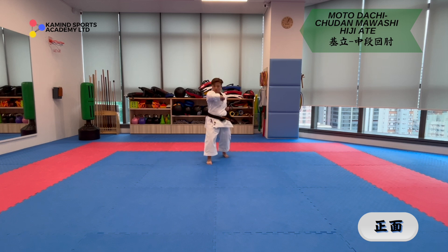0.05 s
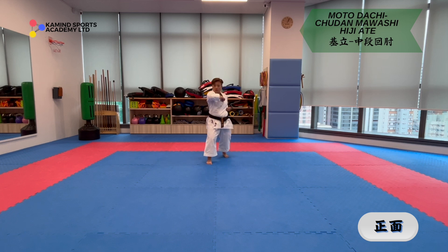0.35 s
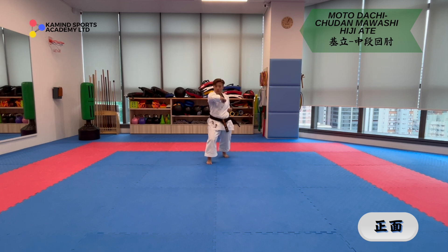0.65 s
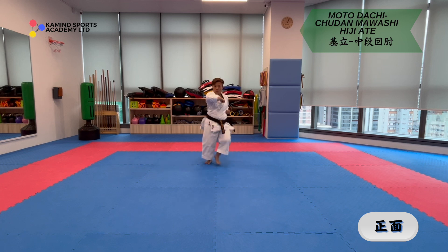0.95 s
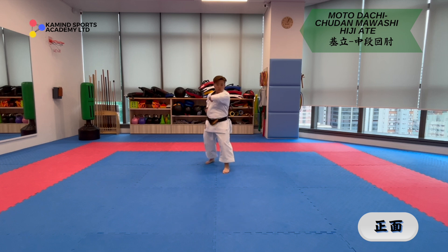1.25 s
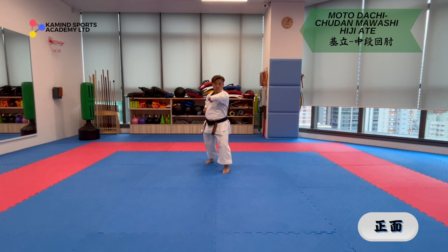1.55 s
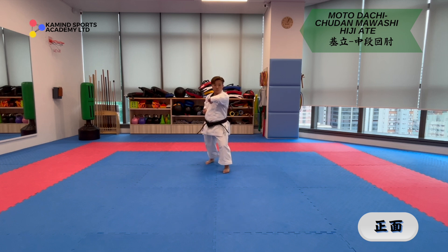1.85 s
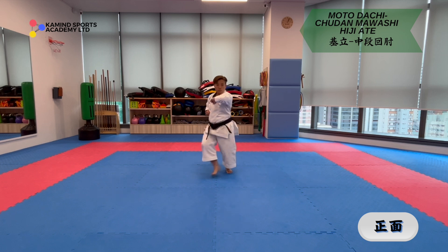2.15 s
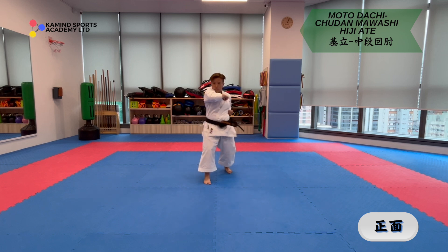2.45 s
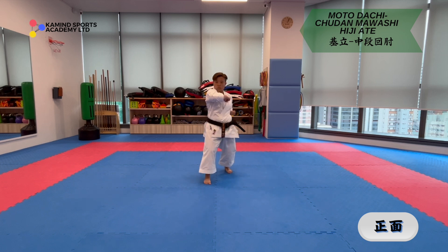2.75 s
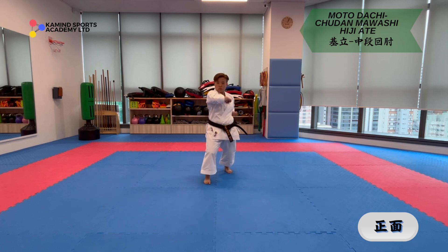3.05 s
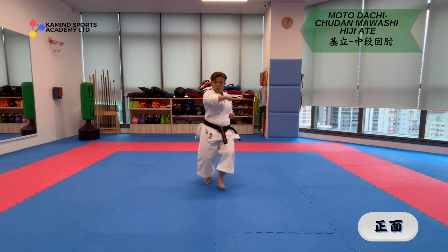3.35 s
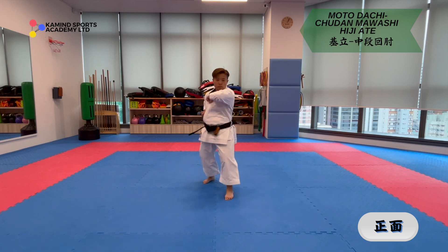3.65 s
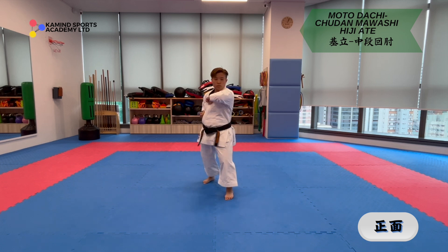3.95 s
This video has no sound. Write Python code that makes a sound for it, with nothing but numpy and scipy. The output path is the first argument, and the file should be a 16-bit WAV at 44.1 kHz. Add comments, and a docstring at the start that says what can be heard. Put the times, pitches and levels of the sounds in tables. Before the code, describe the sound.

A karate uniform rustles and whips as bare feet slide across a foam mat.

```python
"""A hall with a low ventilation rumble; a stereo pair stands a few metres from a foam mat.
A sleeve swipes and stiff cotton whips right at the start. Then someone in uniform takes three sliding
steps, each a light rustle, a sleeve swipe, trouser legs and bare soles brushing past, a soft landing
and the snapping cloth of a strike. The hall rings on after each."""
import sys
import numpy as np
from scipy import signal
from scipy.fft import rfft, irfft
from scipy.io import wavfile
from scipy.ndimage import uniform_filter1d

SR = 44100
rng = np.random.default_rng(int(sys.argv[2]) if len(sys.argv) > 2 else 0)


def transcribe(u):
    """Save the signal u as a 16-bit wav file named by the first command-line argument.

    u: samples, shape (n,) or (channels, n), limited to [-1, 1]; the rate is SR.
    q: integer samples, one column per channel.
    """
    v = np.clip(np.atleast_2d(u).T, -1, 1)
    q = np.round(v * 32767).astype(np.int16)
    wavfile.write(sys.argv[1], SR, q)


N = 176400

# Colour of whipped cotton. Each row: frequency in Hz, gain in dB.
WHIP_COLOUR = [(60, -3), (150, 5), (300, -2), (600, -1.5), (1400, -3), (2200, -7), (4500, -17.5),
               (8000, -20.5), (10500, -28), (15000, -35)]


def undb(db):
    """Decibels to gain."""
    return 10 ** (np.asarray(db) / 20)


def unit(x):
    """Scale to rms 1."""
    return x / np.sqrt(np.mean(x ** 2))


def along(points, hz):
    """Read (Hz, value) points on a log-frequency axis."""
    f, values = np.array(points, float).T
    return np.interp(np.log(np.maximum(hz, 1)), np.log(f), values)


def bins(n):
    """Frequencies of an n-sample spectrum."""
    return np.arange(n // 2 + 1) * SR / n


def colour(x, points):
    """Filter by (Hz, dB) points."""
    n = x.shape[-1]
    return irfft(rfft(x) * undb(along(points, bins(n))), n)


def response(db_at, size=4096):
    """Minimum-phase impulse response of unit energy for a dB curve."""
    cepstrum = irfft(np.log(undb(db_at(bins(size)))))
    cepstrum[1:size // 2] *= 2
    cepstrum[size // 2 + 1:] = 0
    impulse = irfft(np.exp(rfft(cepstrum)))
    return impulse / np.linalg.norm(impulse)


def add(out, start, x):
    """Mix x in from a start time in seconds."""
    i = int(start * SR)
    x = x[max(-i, 0):N - i]
    out[max(i, 0):max(i, 0) + len(x)] += x


def hit(x, db, window_s=.01):
    """Give a short sound its level, as if its energy filled the window."""
    return x / np.linalg.norm(x) * np.sqrt(window_s * SR) * undb(db)


def diffuse(n):
    """Stereo noise from all directions, alike on both sides in the bass."""
    # Each row: frequency in Hz, side minus mid in dB.
    width = [(50, -16), (130, -10.5), (280, -4.5), (550, 1.5), (15000, -2.5)]
    mid, side = rng.standard_normal((2, n))
    return mid + colour(side, width) * np.array([[1], [-1]])


def ventilation():
    """Steady low rumble with a faint rush of air."""
    # Each row of both: frequency in Hz, gain in dB.
    rumble = [(20, -19), (30, -38), (40, -4), (52, 3), (66, 2.5), (82, -18), (108, 2.5), (135, -7),
              (165, -6.5), (210, -9), (270, -20), (340, -28.5), (450, -40), (1500, -67)]
    air = [(150, 6.5), (300, -6), (600, -14.5), (1100, -9.5), (2000, -14.5), (4000, -32), (8000, -34.5),
           (15000, -39.5)]
    return undb(-52.5) * unit(colour(diffuse(N), rumble)) + undb(-58.5) * unit(colour(diffuse(N), air))


def flutter(rate_hz=46, depth_db=1.5):
    """A randomly wavering gain: the cloth slackens and tightens as it moves."""
    span = int(SR / rate_hz)
    waver = uniform_filter1d(rng.standard_normal(N), span, mode="wrap")
    return undb(depth_db * unit(uniform_filter1d(waver, span // 2, mode="wrap")))


def catches(rate_hz, spread_db):
    """Threads catching and letting go: dense clicks of uneven size."""
    chance, size, sign = rng.random(N), rng.standard_normal(N), rng.choice([-1, 1], N)
    return unit((chance < rate_hz / SR) * sign * undb(spread_db * np.clip(size, -2, 2)))


def rub(moves, spectrum, release_s, grain, catch_hz, spread_db, peak_db, peak_oct):
    """Friction hiss and thread catches swell, hold and die, coloured by the moving panel."""
    # Each row of moves: start, rise and hold in seconds, level in dB, peak in Hz, treble in dB.
    # Each row of spectrum: frequency in Hz, gain in dB. Grain is the catches' share of the power.
    out, t = np.zeros(N), np.arange(SR // 2) / SR
    threads = np.sqrt(grain) * catches(catch_hz, spread_db)
    hiss = np.sqrt(1 - grain) * rng.standard_normal(N)
    friction = flutter() * (threads + hiss)
    for start, rise, hold, db, hz, treble_db in moves:
        speed = np.minimum(t / rise, 1) * np.exp(-np.maximum(t - rise - hold, 0) / release_s)
        panel = response(lambda f: along(spectrum, f)
                         + peak_db * np.exp(-.5 * (np.log2((f + 1) / hz) / peak_oct) ** 2)
                         + treble_db * f ** 2 / (f ** 2 + 3500 ** 2))
        stroke = speed * np.roll(friction, rng.integers(N))[:len(t)]
        add(out, start, undb(db) * signal.fftconvolve(stroke, panel))
    return out


def sleeve_swipes():
    """A sleeve wipes across the chest."""
    # Rows as in rub.
    wipes = [(-.03, 0.012, 0.037, -36, 2080, 8), (.755, 0.036, 0.0046, -40.5, 1340, -10),
             (.795, 0.011, 0.019, -37.5, 1420, -2.5), (.84, .02, 0.032, -46, 980, -18),
             (1.968, 0.0065, .003, -39, 1200, 6), (1.98, 0.0014, 0.0068, -37.5, 3180, 7),
             (1.982, 0.0064, 0.026, -35, 1290, -7.5), (3.156, 0.0033, 0.012, -38, 1130, 3.5),
             (3.171, 0.0025, 0.016, -38.5, 2980, -4.5), (3.208, 0.0036, 0.0056, -37.5, 1300, -4)]
    sleeve = [(60, -34), (200, -4), (550, -5), (950, -0.5), (1550, -1.5), (2050, -5), (3100, -3.5),
              (3750, -9.5), (4400, -8), (5700, -16), (7000, -15.5), (10500, -27), (15000, -39)]
    return rub(wipes, sleeve, release_s=.017, grain=.26, catch_hz=2500, spread_db=7,
               peak_db=6, peak_oct=.2)


def strikes():
    """The uniform whips at the end of a strike."""
    # Rows as in rub.
    whips = [(-.02, 0.021, 0.034, -37.5, 660, -4.5), (1.142, .003, 0.019, -33.5, 570, 7),
             (1.16, 0.0078, 0.015, -32.5, 730, 7), (1.205, 0.019, 0.0057, -35.5, 845, 0.5),
             (2.325, 0.043, 0.037, -36, 960, 7), (2.385, .015, 0.022, -34, 740, -1),
             (2.44, 0.0095, 0.015, -44.5, 750, 0), (3.504, .004, 0.029, -36.5, 600, 11),
             (3.53, 0.0091, 0.022, -36, 770, 3), (3.58, 0.0087, 0.018, -45, 650, -5)]
    return rub(whips, WHIP_COLOUR, release_s=.022, grain=.36, catch_hz=900, spread_db=7.5,
               peak_db=6, peak_oct=.17)


def jacket_rustles():
    """The jacket shifts lightly, cloth on cloth."""
    # Rows as in rub.
    shifts = [(.42, 0.026, 0.21, -66.5, 497, 0.5), (.615, 0.038, 0.02, -54.5, 550, -24),
              (.692, 0.0052, 0.15, -48.5, 2800, 8.5), (1.28, 0.021, 0.035, -44, 1330, -0.5),
              (1.545, 0.0055, 0.0037, -58.5, 1470, -4), (1.748, 0.033, 0.07, -53.5, 2930, 0.5),
              (1.85, 0.029, 0.073, -51, 950, -2), (2.93, 0.082, .01, -61.5, 1800, 7),
              (3.026, 0.0034, 0.062, -51.5, 1580, 8), (3.07, 0.034, 0.069, -49, 1280, 5),
              (3.875, 0.0087, 0.013, -61, 1980, 3), (3.93, 0.0095, .06, -74, 1510, 5)]
    jacket = [(60, -2), (200, 3), (500, 0), (1100, 0), (2000, -3), (3500, -4.5), (6000, -11.5),
              (10000, -18.5), (15000, -29)]
    return rub(shifts, jacket, release_s=.017, grain=.75, catch_hz=1600, spread_db=4,
               peak_db=4.5, peak_oct=.18)


def knocks(contacts, spectrum, decay_s, scatter):
    """Short contacts: a push followed by a quickly dying scatter."""
    # Each row of contacts: start in seconds, level in dB; of spectrum: frequency in Hz, gain in dB.
    out, t = np.zeros(N), np.arange(SR // 8) / SR
    body = response(lambda f: along(spectrum, f))
    for start, db in contacts:
        tail = rng.standard_normal(len(t)) * np.exp(-t / decay_s)
        force = (t == 0) + scatter * tail / np.linalg.norm(tail)
        add(out, start, hit(signal.fftconvolve(force, body), db))
    return out


def ticks():
    """Cloth and soles make small sharp contacts."""
    # Rows as in knocks.
    touches = [(.438, -67), (.698, -58), (.944, -48), (.95, -47), (1.143, -50), (1.541, -69), (1.553, -63),
               (1.845, -52), (1.923, -59), (1.981, -62), (2.01, -49), (2.231, -47.5), (3.029, -53),
               (3.173, -46), (3.177, -46), (3.507, -45.5), (3.624, -48)]
    spectrum = [(80, -20), (600, -10), (2000, -5), (7000, -9), (10000, -10), (15000, -22)]
    return knocks(touches, spectrum, decay_s=.0023, scatter=2.3)


def sole_skims():
    """Bare soles skim the mat with a high hiss."""
    # Rows as in rub.
    skims = [(.44, 0.011, .07, -78.5, 9100, 0), (.62, 0.059, .015, -72.5, 9000, 0),
             (.86, 0.017, 0.11, -57, 12000, 0), (1.49, 0.037, 0.021, -84, 9000, 0),
             (1.84, .06, .06, -68, 11800, 0), (2.06, 0.047, .015, -52.5, 9100, 0),
             (3.235, 0.016, 0.12, -57, 12000, 0)]
    sole = [(200, -32), (2000, -12), (5000, 18), (9000, 2), (11000, -4), (15000, -12)]
    return rub(skims, sole, release_s=.016, grain=.57, catch_hz=1400, spread_db=4,
               peak_db=15.5, peak_oct=.85)


def trouser_brushes():
    """Trouser legs brush each other during a step."""
    # Rows as in rub.
    brushes = [(.865, 0.013, 0.04, -38, 910, -24), (.905, 0.022, 0.056, -43, 596, -7),
               (.99, 0.048, 0.049, -40.5, 593, 2.5), (1.09, 0.026, 0.017, -40.5, 530, 2),
               (2.02, 0.025, 0.049, -40, 706, 6), (2.06, 0.039, 0.014, -38, 1020, -5),
               (2.14, 0.04, 0.081, -40.5, 610, -0.5), (2.26, 0.043, 0.11, -43, 790, 4),
               (3.215, 0.015, 0.045, -39.5, 533, -19), (3.255, 0.025, 0.033, -40.5, 930, -7),
               (3.32, 0.013, 0.08, -44, 537, -7), (3.38, 0.036, 0.022, -36.5, 910, 0),
               (3.45, .02, 0.055, -47, 603, 9)]
    trousers = [(60, 1), (150, 6), (300, -3), (600, -5.5), (1100, -8.5), (2000, -9), (4500, -18),
                (8000, -23), (10500, -28), (15000, -32)]
    return rub(brushes, trousers, release_s=.009, grain=.38, catch_hz=900, spread_db=1.5,
               peak_db=7, peak_oct=.7)


def footfalls():
    """Feet load the foam with a soft thud."""
    # Rows as in knocks.
    landings = [(.9, -45), (1.0, -36.5), (1.17, -38), (1.55, -48), (2.03, -44), (2.247, -29),
                (2.286, -33.5), (2.305, -28.5), (2.39, -39), (3.435, -34)]
    mat = [(25, -51), (55, -3), (75, 12.5), (115, -4.5), (190, -12), (400, -32), (1500, -66)]
    return knocks(landings, mat, decay_s=.011, scatter=.47)


def fold_snaps(ring_s=.0016):
    """A fold snaps taut: the panel swings for a few cycles, with a short crack."""
    # Each row: start in seconds, level in dB, pitch in Hz.
    folds = [(.910, -33, 600), (1.012, -35.5, 348), (1.146, -35.5, 525), (1.174, -33, 420),
             (1.232, -37, 1200), (2.027, -31, 417), (2.231, -26, 578), (2.242, -31, 930), (2.25, -31, 1010),
             (2.372, -36.5, 1270), (2.388, -26.5, 720), (2.405, -32, 690), (2.424, -35, 676),
             (3.507, -27.5, 634), (3.514, -27, 570), (3.521, -30, 772), (3.541, -45.5, 620)]
    out, t = np.zeros(N), np.arange(SR // 20) / SR
    cloth = response(lambda f: along(WHIP_COLOUR, f))
    for start, db, hz in folds:
        swing = t / ring_s * np.exp(-t / ring_s)
        crack = signal.fftconvolve(rng.standard_normal(len(t)) * swing, cloth)[:len(t)]
        add(out, start, hit(.63 * crack - np.sin(2 * np.pi * hz * t) * swing, db))
    return out


def hall(x, gap_s=.005, early_s=.011, early_db=-8.5, tail_db=-2):
    """Early reflections off mat, ceiling and windows, then a tail whose treble dies first."""
    # Each row: frequency in Hz, seconds to fall by 60 dB.
    decays = [(60, 1), (250, 0.91), (700, 0.63), (2000, 0.72), (4000, 0.72), (8000, 0.55), (15000, 0.41)]
    t, f = np.arange(SR) / SR, bins(SR)
    field, tail = rfft(diffuse(SR)), 0
    for hz, t60 in decays:
        band = along([(centre, centre == hz) for centre, _ in decays], f)
        tail = tail + irfft(field * band) * undb(-60 * t / t60)
    early = diffuse(SR) * np.exp(-t / early_s)
    echoes = undb(tail_db) * tail / np.linalg.norm(tail[0])
    echoes += undb(early_db) * early / np.linalg.norm(early[0])
    delayed = np.pad(echoes, ((0, 0), (int(gap_s * SR), 0)))
    return signal.fftconvolve(x[None], delayed, axes=1)[:, :N]


def moving_hall(x, spots=6, travel_s=.022):
    """The hall answers differently as the body moves: fade from one spot's echoes to the next."""
    position = np.arange(N) / SR / travel_s
    distances = [np.abs((position - k + spots / 2) % spots - spots / 2) for k in range(spots)]
    return sum(hall(x * np.cos(np.pi / 2 * np.minimum(away, 1))) for away in distances)


def sends(x, direct_db, room_db):
    """A source's direct sound and its share for the hall."""
    return np.array([undb(direct_db) * x, undb(room_db) * x])


def scene():
    """Uniform and feet a few metres off, direct and through the hall, over the ventilation."""
    direct, room = (sends(sleeve_swipes(), direct_db=-1.5, room_db=1)
                    + sends(strikes(), direct_db=-4, room_db=-1.5)
                    + sends(jacket_rustles(), direct_db=-2.5, room_db=.5)
                    + sends(ticks(), direct_db=-1.5, room_db=-2)
                    + sends(sole_skims(), direct_db=4.5, room_db=1.5)
                    + sends(trouser_brushes(), direct_db=-3, room_db=1.5)
                    + sends(footfalls(), direct_db=-.5, room_db=-4.5)
                    + sends(fold_snaps(), direct_db=-6.5, room_db=-7))
    return direct + moving_hall(room) + ventilation()


def record(dry):
    """The two microphones differ in colour and phase; the top is cut at 15.4 kHz."""
    # Each row: frequency in Hz, then the value named alongside.
    balance = [(60, -0.1), (200, .5), (700, 2), (1300, 3), (2400, 2.5), (4400, 5.5), (6000, 5), (7500, 0),
               (10500, -4.5), (15000, 2.5)]  # left minus right in dB
    phase = [(100, 0), (1300, 0.22), (3200, 0.84), (6000, 2), (7600, -4), (9500, -1), (11000, -3.5),
             (12000, -6.5), (13700, -2.5), (15000, -8)]  # left's lead in radians
    timbre = [(230, -1), (310, 1), (380, 1.5), (560, 2.5), (640, 2), (735, 2), (840, 2), (960, 2),
              (1400, -0.5), (1900, 0.5), (3100, -1), (3600, -1), (4300, 1), (5000, 0)]  # gain of room and microphones in dB
    f = bins(N)
    left = undb(along(balance, f) / 2) * np.exp(.5j * along(phase, f))
    pair = irfft(rfft(dry) * np.array([left, 1 / left]) * undb(along(timbre, f)), N)
    return signal.sosfilt(signal.ellip(10, .2, 70, 15400, fs=SR, output="sos"), pair)


dry = scene()
out = record(dry)
transcribe(out)
```